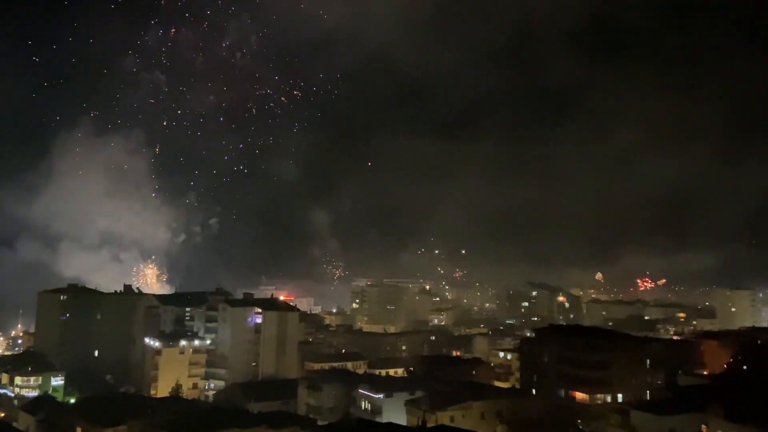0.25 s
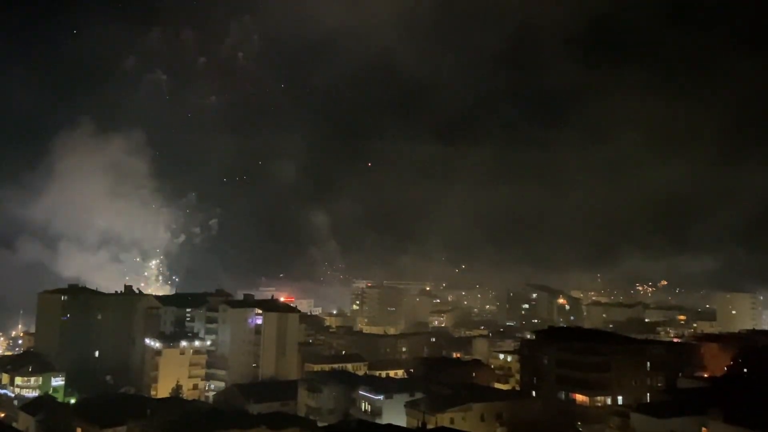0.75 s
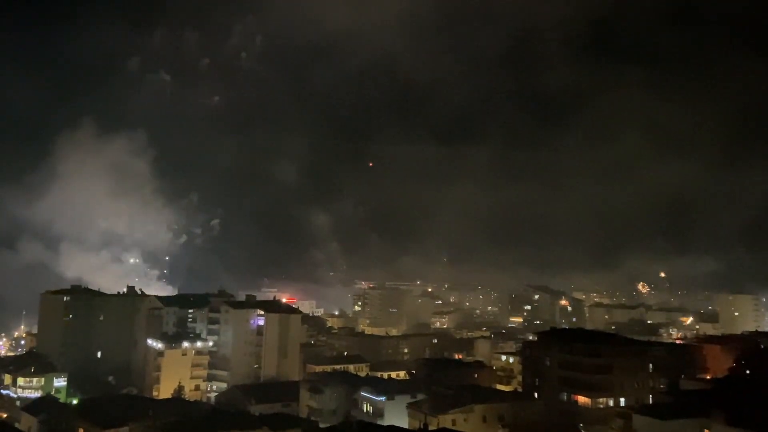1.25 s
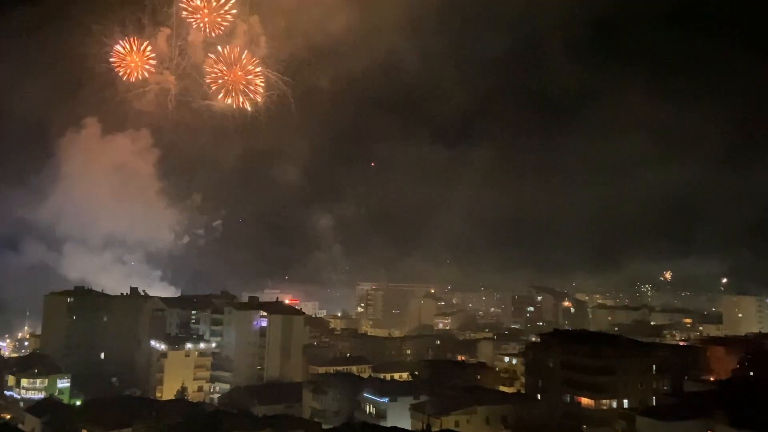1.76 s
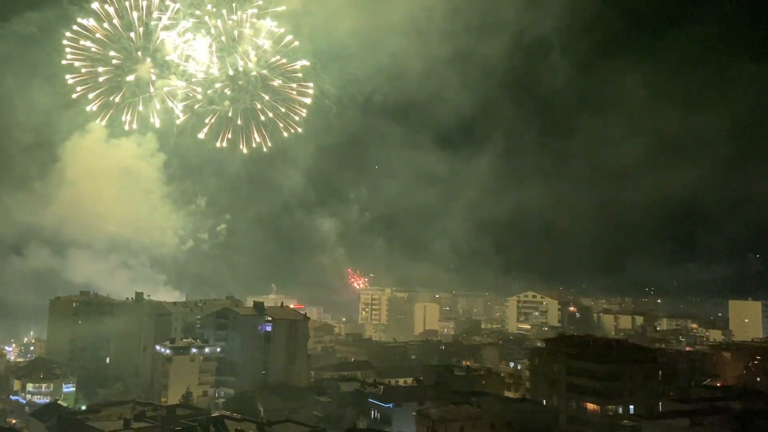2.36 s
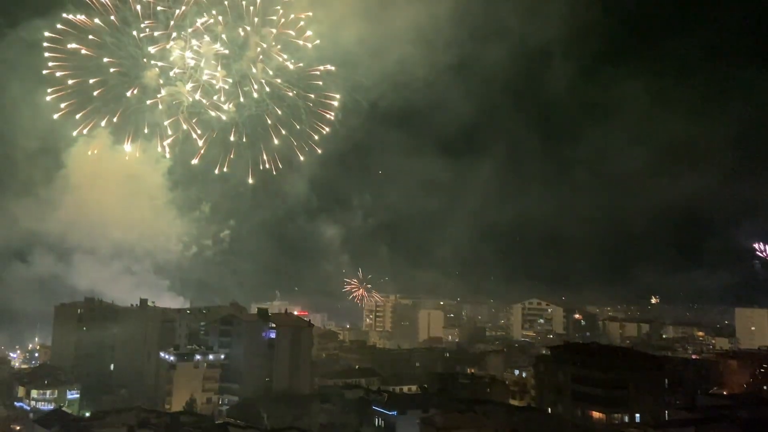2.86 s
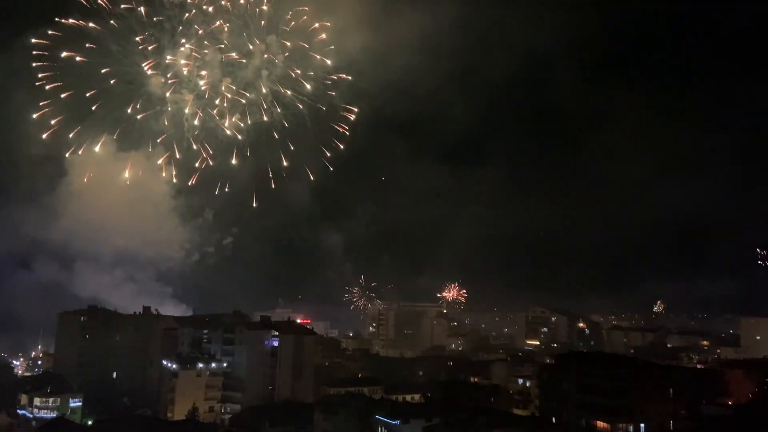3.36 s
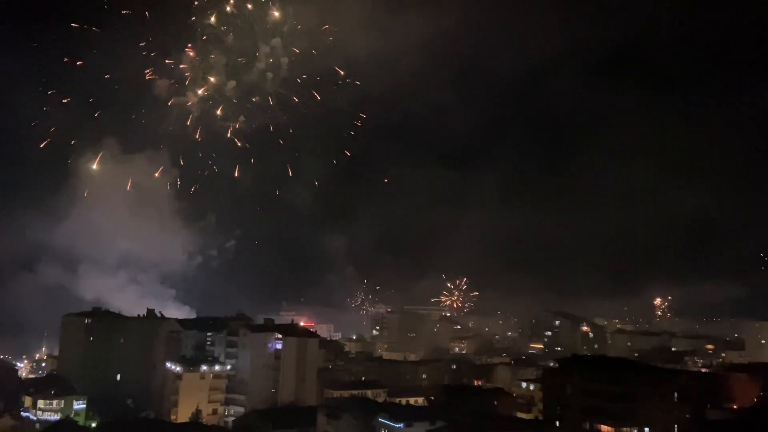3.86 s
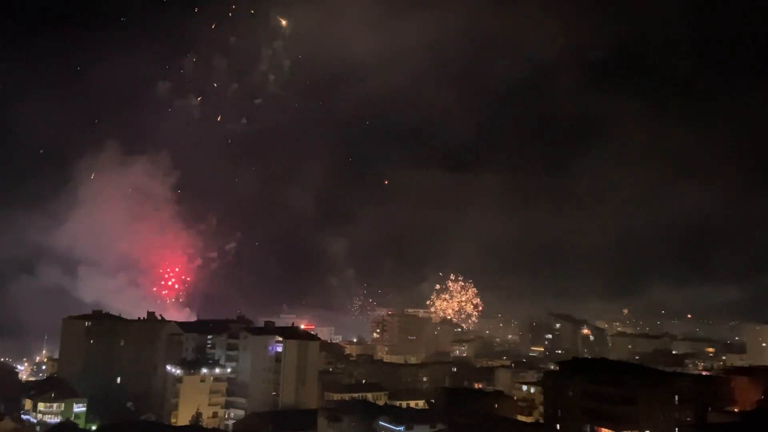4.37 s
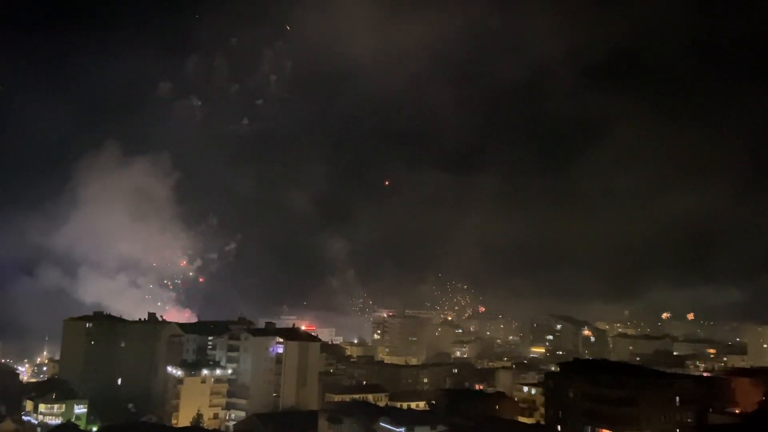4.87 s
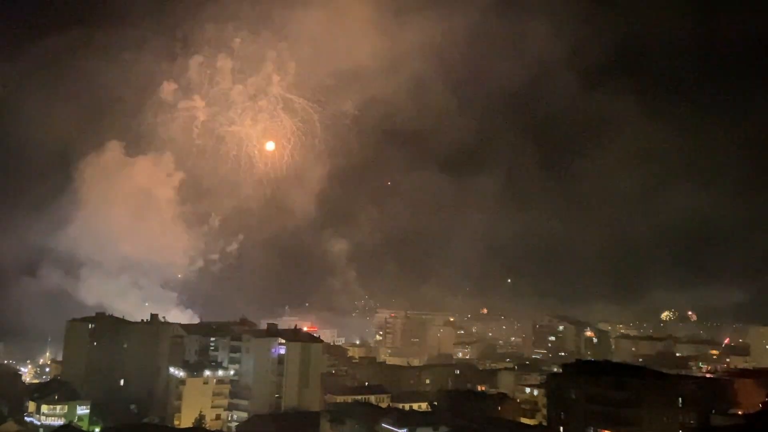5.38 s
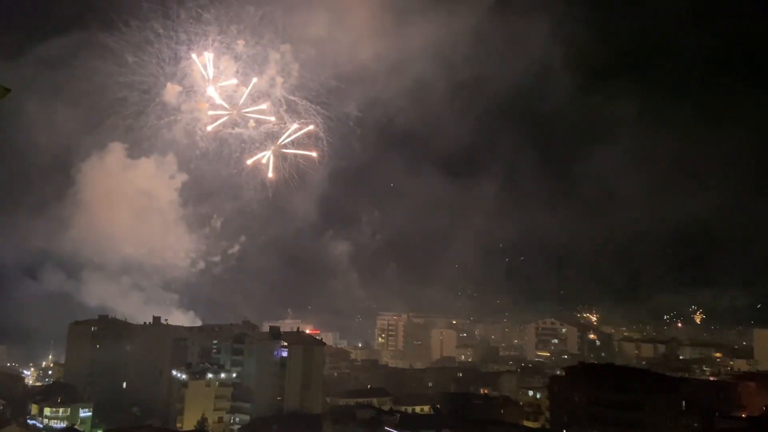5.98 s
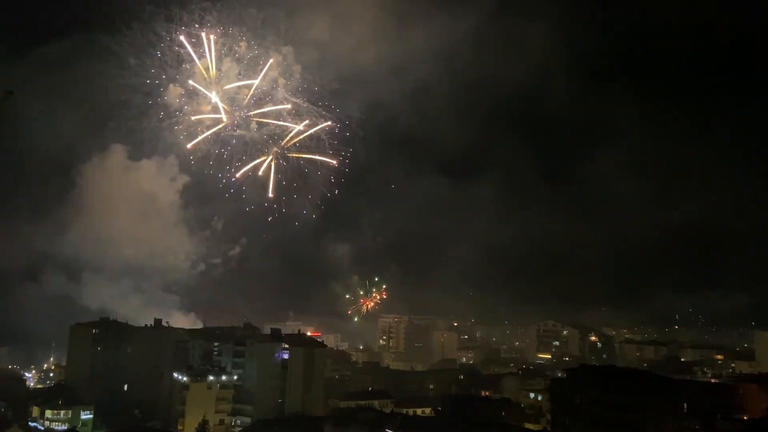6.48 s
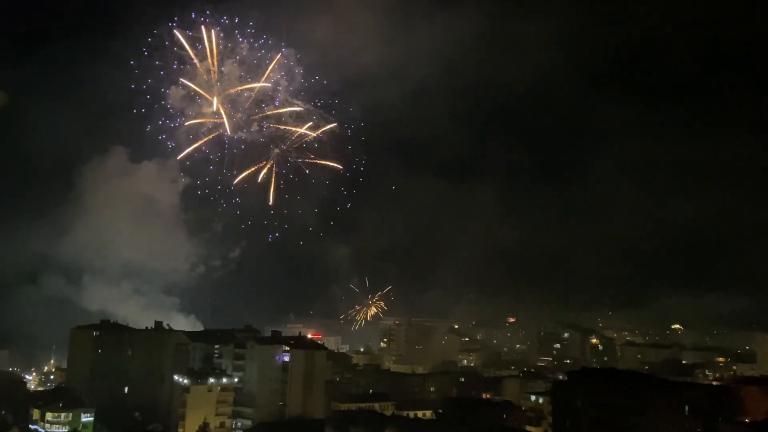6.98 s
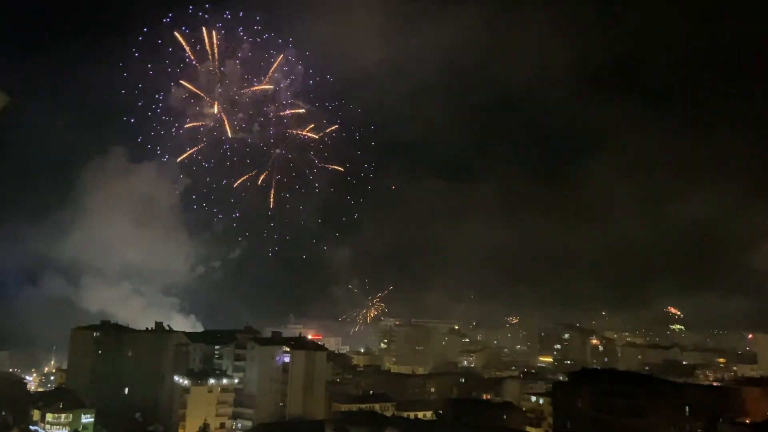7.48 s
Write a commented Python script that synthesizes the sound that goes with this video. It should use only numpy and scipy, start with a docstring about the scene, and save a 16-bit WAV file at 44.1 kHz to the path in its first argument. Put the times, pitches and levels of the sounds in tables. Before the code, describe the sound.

From a high window, close firework blasts bang in clusters while far pops, crackling stars and rolling echoes fill the night town.

```python
"""Fireworks over a town at night, heard from a high window.
0-2.7 s: salvo echo already rolling over a steady din (shaped noise and clicks); far pops (smeared weak fronts),
near blasts (shock and suction pulses with echoes), star sizzle (dense clicks), single snaps (short blasts).
2.7-5.3 s: second salvo, low rolls (band-passed noise), dense blasts; right side louder from 3.4 s.
5.3-6.2 s: no near blasts, distant crackle. 6.2-7 s: third salvo and blasts; then low rolls, last blast at 7.7 s."""
import sys
import numpy as np
from scipy import signal
from scipy.fft import rfft, irfft, next_fast_len
from scipy.io import wavfile
from scipy.ndimage import uniform_filter1d, minimum_filter1d

SR = 44100
rng = np.random.default_rng(int(sys.argv[2]) if len(sys.argv) > 2 else 0)


def unload_wav(signal):
    """Save mono or channel-first audio to the path in sys.argv[1] as 16-bit WAV at rate SR, clipped to [-1, 1]."""
    wavfile.write(
        sys.argv[1],
        SR,
        np.round(np.clip(np.atleast_2d(signal).T, -1, 1) * 32767).astype(np.int16),
    )


N = 340893

# spectra of noise and clicks: f/Hz, relative density/dB per Hz
RUMBLE_SPECTRUM = [(20, -27), (40, -29.5), (60, 2), (95, 2.5), (130, 4), (190, 7), (280, -4), (600, -59),
                   (3000, -100)]
ROAR_SPECTRUM = [(30, -53), (90, -12.5), (170, 1.5), (250, 5.5), (450, 1), (700, -1.5), (1000, -15),
                 (1500, -27.5), (3000, -64.5), (9000, -100)]
BOOM_SPECTRUM = [(15, -23), (30, -20), (58, 2), (80, -1.5), (160, -34.5), (1000, -100)]
THUD_SPECTRUM = [(80, -39.5), (220, -15.5), (350, -1), (540, 3.5), (800, -10), (1300, -18.5), (3000, -41.5),
                 (9000, -100)]   # separate far thuds that make the roar ragged
FAR_CRACKLE_SPECTRUM = [(60, -38.5), (400, 6), (900, 4), (1300, 2.5), (1550, -1), (2000, -1.5),
                        (3000, -11.5), (4500, -22.5), (6000, -40.5), (9000, -67.5), (16000, -99)]
NEAR_HISS_SPECTRUM = [(100, -38.5), (1000, 6.5), (3000, 17.5), (4900, 11), (6000, 0.5), (7500, 0.5),
                      (9000, -28), (10500, -14), (16000, -43)]
STAR_SPECTRUM = [(60, -34), (200, 17.5), (600, 16.5), (2200, 0.5), (4800, -6), (7500, -16.5),
                 (11000, -24.5), (16000, -43)]
# one band: tiny charges have no bass, the air takes their treble
FAR_CLOUD_SPECTRUM = [(300, -44), (1100, -10), (1700, 4), (2300, 1.5), (2900, -6), (4200, -22),
                      (6000, -42.5), (12000, -82.5)]
# likeness of left and right: f/Hz, correlation/1
STEREO_LIKENESS = [(60, 0.81), (130, 0.94), (290, 0.49), (640, 0.011), (1400, 0.29), (3000, 0.58),
                   (7000, 0.8), (15000, 1)]

# steady din from all over town; crackle before far_gain_db
DIN_RUMBLE_DB, DIN_ROAR_DB, DIN_CRACKLE_DB = -39.5, -41, -49.5
# echoes of big salvos: t/s, rumble/dB, roar/dB, far crackle/dB, near hiss/dB (last two before crackle gains)
SALVOS = [(-0.4, -32, -27.5, -36.5, -46.5), (2.721, -24.5, -25, -34.5, -46),
          (6.8, -22, -28.5, -33.5, -46.5)]
# rise as the wave reaches more streets, then fall, treble first
ROLL_RISE_S, HISS_RISE_S = 0.51, 0.42
RUMBLE_FALL_DB_PER_S, ROAR_FALL_DB_PER_S, CRACKLE_FALL_DB_PER_S, HISS_FALL_DB_PER_S = 8, 10.5, 11.5, 29
# distant barrages: t/s, rise/s, crackle/dB (before far_gain_db), roar/dB
BARRAGES = [(0.0, 0.11, -43, -48), (1.001, 0.02, -40, -34), (1.249, 0.17, -43, -40),
            (1.699, 0.052, -35, -53), (2.43, 0.016, -46, -37.5), (3.42, 0.32, -32, -28.5),
            (3.9, 0.24, -40, -39), (4.28, 0.23, -30.5, -28), (4.749, 0.32, -38.5, -35),
            (5.35, 0.21, -40.5, -35), (5.551, 0.35, -39, -38), (7.05, 0.21, -33.5, -31)]
BARRAGE_FALL_DB_PER_S = 33.5
THUD_DB = -5.5   # re roar level

# star clouds across town: t/s, rise/s, level/dB
FAR_CLOUDS = [(0.08, 0.057, -41), (0.39, 0.04, -43.5), (3.55, 0.13, -37.5), (4.42, 0.059, -44.5),
              (5.62, 0.25, -39), (5.93, 0.093, -44.5)]
FAR_CLOUD_FALL_DB_PER_S = 53
# far bursts: t/s, peak/dB (before level_db), thud f/Hz
POPS = [(0.145, -19, 417), (0.165, -18.5, 450), (0.307, -17.5, 380), (0.653, -13.5, 268), (0.721, -22, 236),
        (1.526, -16, 457), (1.583, -15.5, 480), (1.682, -20.5, 450), (2.162, -18.5, 420), (2.176, -23, 300),
        (2.252, -19, 480), (2.326, -20.5, 320), (2.482, -21.5, 600), (2.505, -19.5, 560),
        (2.851, -15.5, 260), (3.053, -14, 404), (3.458, -11, 400), (3.51, -7.5, 380), (3.615, -21, 260),
        (4.351, -24, 400), (4.87, -12.5, 296), (5.29, -17, 613), (5.562, -17.5, 525), (5.619, -21, 288),
        (6.314, -26, 600), (6.448, -18.5, 600), (6.641, -12, 520), (6.993, -16, 620), (7.594, -21, 239)]
POP_SMEAR_S = 0.012
# long echoes, each from one part of town: t/s, level/dB, f/Hz
ROLLS = [(0.131, -32, 75), (0.293, -37, 70), (0.639, -32, 94), (1.209, -45, 70), (1.73, -37, 161),
         (2.73, -24, 90), (2.81, -28, 115), (3.07, -19.5, 112), (3.159, -28, 125), (3.3, -22.5, 147),
         (3.352, -22.5, 66), (3.66, -25, 145), (3.86, -29, 94.6), (7.078, -27.5, 161), (7.179, -23, 164),
         (7.32, -26, 130.8), (7.631, -28, 79.6)]
ROLL_SWELL_S, ROLL_WIDTH_RATIO = 0.024, 1.3   # time to peak; band edges re f
# clouds of crackling stars: t/s, level/dB, decay/s
STAR_CLOUDS = [(1.016, -27.5, 0.02), (1.065, -32.5, 0.024), (1.599, -35, 0.24), (1.721, -24, 0.037),
               (2.165, -42, 0.2), (2.468, -43, 0.052), (2.720, -31.5, 0.3), (2.944, -29, 0.14),
               (3.411, -26, 0.11), (3.44, -21, 0.0082), (3.675, -34.5, 0.18), (4.348, -36, 0.36),
               (4.454, -31.5, 0.047), (5.893, -41.5, 0.16), (6.395, -30, 0.071), (6.96, -25.5, 0.051)]
CLOUD_SWELL_S = 0.012
# facade hiss after each cloud: level re cloud (before near_gain_db)
CLOUD_HISS_DB, CLOUD_HISS_RISE_S, CLOUD_HISS_FALL_DB_PER_S = -25, 0.082, 54.5

# near bursts: t/s, blast/dB, overpressure/ms, air cut-off f/Hz, facade echo/dB, ledge delay/ms, ledge echo/dB
BANGS = [(0.3037, -10.5, 3.2, 2200, -18, 7.9, -10), (0.5576, 5, 1.8, 2900, -8.5, 5.3, -11.5),
         (1.022, -7, 1.25, 4600, -4.5, 6.3, -11), (1.1914, 7.5, 0.87, 2000, -16.5, 3.3, -9),
         (1.7224, -0.5, 0.42, 5200, -5, 0.85, -15), (1.8698, -5.5, 1.5, 1090, -25, 0.62, -17),
         (2.7176, 5.5, 3.7, 3200, -7.5, 1.1, -27), (2.7974, 3, 3, 4530, -9.5, 2.2, -12),
         (2.803, 2.5, 3.2, 5800, -11, 2.2, -10), (3.4082, 4, 1.14, 6500, -13, 0.95, -19),
         (3.4488, 1, 0.56, 11200, -3, 0.56, -14), (3.5023, 2.5, 1.15, 3930, -9.5, 1.8, -30),
         (3.7383, 4, 1.42, 2440, -5, 3.8, -10), (4.3269, -6.5, 0.98, 1400, 0.5, 1.7, -1),
         (4.3894, -8.5, 0.45, 3000, 6, 1.7, -8), (4.7929, 9.5, 1.4, 1950, -10.5, 5.4, -8),
         (5.2109, 6, 1.36, 2900, -10, 2.8, -11), (6.242, -0.5, 1.03, 1200, -5, 5.3, -6),
         (6.3014, -4.5, 0.78, 1130, -12, 1.8, -9), (6.3987, -3.5, 1.33, 2400, -1.5, 8.6, -10),
         (6.653, 7, 3.3, 4200, -7, 1.6, -14), (6.8168, 6, 3.3, 6000, -5, 0.9, -12),
         (6.895, 5.5, 3.6, 4700, -7.5, 1.1, -27), (6.9527, -1, 0.75, 6600, -16, 1.7, -9),
         (6.9941, -2, 0.75, 2400, -19, 1.6, 1.5), (7.7090, 6.5, 1.6, 2070, -9, 4.07, -1.5)]
# single stars apart from the clouds: t/s, blast/dB, air cut-off f/Hz
SNAPS = [(0.151, -6, 1600), (0.19, -7, 1700), (0.334, -14, 2010), (0.47, -23.5, 6000), (1.071, -8.5, 2500),
         (1.082, -12.5, 4000), (1.7402, -1.5, 2000), (1.755, -6, 1400), (2.146, -25, 3440),
         (2.162, -16, 1400), (3.064, -7, 2000), (3.312, -10, 3500), (3.429, -7, 4500), (3.445, -7, 3500),
         (3.456, -10.5, 2970), (3.57, -6, 2000), (3.604, -9, 5000), (4.351, -21, 4000), (4.469, -2.5, 1800),
         (4.4856, 1, 1500), (6.09, -10, 1500), (6.459, -7, 5250), (6.686, -11.5, 8000),
         (6.765, -18.5, 6000), (6.9276, -14, 9000), (6.975, -11, 5000)]
SNAP_MS, SNAP_ECHO_DB, SNAP_LEDGE_MS, SNAP_LEDGE_DB = 0.19, 2, 0.94, -9.5
AIR_STEEP_RATIO = 3.9   # re air cut-off: treble falls twice as steeply above
# walls beside the window: nominal delay/s, echo/dB
WALLS = [(.0029, -12), (.0047, -13), (0.012, -19.5)]
# hollow notes of the window recess: f/Hz, width/Hz, gain/dB
RECESS_NOTES = [(132.3, 26.5, -5.5), (370, 174, -8)]

# microphone all-passes, low notes later, so a blast sweeps downward: f/Hz, Q/1
MIC_DISPERSION = [(142, 1.53), (320, 1.36), (255, 0.06), (3250, 0.51)]
# left port lags right around these notes: f/Hz, Q/1
PORT_LAG = [(1400, 3.4), (9000, 3.7), (13300, 32)]
# right port shaded, then mostly uncovered: t/s, left minus right below the top treble/dB
PORT_SHADE = [(3.42, 8.5), (3.62, 2)]
CUTOFF_HZ = 16600


def from_db(db):
    """Decibels to gain."""
    return 10 ** (np.asarray(db) / 20)


def rms_one(x):
    """Scale to unit power."""
    return x / np.sqrt(np.mean(x ** 2) + 1e-20)


def at_hz(points, hz):
    """Read a table along a log-frequency axis."""
    f, value = np.transpose(points)
    return np.interp(np.log(hz + 1), np.log(f), value)


def add(out, s, sound):
    """Mix a stereo sound in at time s."""
    start = max(round(s * SR), 0)
    out[:, start:start + sound.shape[1]] += sound[:, :max(N - start, 0)]


def cut(x, hz, kind, order):
    """Butterworth low-pass or high-pass."""
    sos = signal.butter(order, np.clip(hz, 10, .45 * SR), kind, fs=SR, output="sos")
    return signal.sosfilt(sos, x + 1e-18)


def allpass(x, hz, q):
    """Delay the notes around hz, level unchanged."""
    w = 2 * np.pi * hz / SR
    a = [1 + np.sin(w) / (2 * q), -2 * np.cos(w), 1 - np.sin(w) / (2 * q)]
    return signal.lfilter(a[::-1], a, x + 1e-18)


def diffuse(pair, spectrum=None):
    """Two unrelated signals to surround sound: alike in bass and top treble, least alike near 640 Hz."""
    length = pair.shape[1]
    size = next_fast_len(length, True)
    hz = np.arange(size // 2 + 1) * SR / size
    weight = from_db(at_hz(spectrum, hz)) if spectrum else 1
    mid, side = rfft(pair, size) * weight
    alike = np.clip(at_hz(STEREO_LIKENESS, hz), -1, 1)
    mid, side = mid * np.sqrt(1 + alike), side * np.sqrt(1 - alike)
    return rms_one(irfft(np.array([mid + side, mid - side]), size)[:, :length])


def reports(per_s, spread_db, wash_db):
    """Countless small explosions: random clicks of uneven size on a smooth noise wash."""
    sizes = from_db(spread_db * np.minimum(rng.exponential(1, (2, N)), 4))
    signs = rng.choice([-1, 1], (2, N))
    clicks = sizes * signs * (rng.random((2, N)) < per_s / SR)
    return rms_one(clicks) + from_db(wash_db) * rng.standard_normal((2, N))


def clumps(per_s, depth_db, size=N):
    """Randomly wandering gain: bursts and echoes arrive in bunches."""
    knots = rng.standard_normal(2000)
    wander = np.interp(np.arange(size) / SR * per_s, np.arange(len(knots)), knots)
    return from_db(depth_db * wander)


def swell(s, rise_s, fall_db_per_s):
    """Envelope: linear climb from time s to 1, then exponential fall."""
    age = np.arange(N) / SR - s
    return np.clip(age / rise_s, 0, 1) * from_db(-fall_db_per_s * np.maximum(age - rise_s, 0))


def together(levels):
    """Unrelated sounds sum in power."""
    return np.sqrt(sum(level ** 2 for level in levels))


def rolling_echoes(boom_gain_db=5, boom_growth=1.54):
    """Bursts all over town merge into rumble and roar; the deep boom grows faster than the rumble."""
    rumble_level = together(
        [from_db(DIN_RUMBLE_DB)]
        + [from_db(db) * swell(s, ROLL_RISE_S, RUMBLE_FALL_DB_PER_S) for s, db, _, _, _ in SALVOS])
    roar_level = together(
        [from_db(DIN_ROAR_DB)]
        + [from_db(db) * swell(s, ROLL_RISE_S, ROAR_FALL_DB_PER_S) for s, _, db, _, _ in SALVOS]
        + [from_db(db) * swell(s, rise_s, BARRAGE_FALL_DB_PER_S) for s, rise_s, _, db in BARRAGES])
    rumble = diffuse(reports(per_s=72, spread_db=-2.5, wash_db=-2.0), RUMBLE_SPECTRUM)
    rumble = rumble * clumps(per_s=18, depth_db=2.5)
    roar = diffuse(reports(per_s=200, spread_db=-1.5, wash_db=11.0), ROAR_SPECTRUM)
    roar = roar * clumps(per_s=45, depth_db=2.15)
    thuds = diffuse(reports(per_s=60, spread_db=2.5, wash_db=-15), THUD_SPECTRUM)
    boom = diffuse(rng.standard_normal((2, N)), BOOM_SPECTRUM)
    boom = boom * from_db(boom_gain_db) * rumble_level ** boom_growth
    return rumble_level * rumble + roar_level * (roar + from_db(THUD_DB) * thuds) + boom


def crackle(far_gain_db=2, near_gain_db=4):
    """Dense clicks follow salvos, barrages and star clouds; the air takes the treble from the far ones."""
    far_level = together(
        [from_db(DIN_CRACKLE_DB)]
        + [from_db(db) * swell(s, ROLL_RISE_S, CRACKLE_FALL_DB_PER_S) for s, _, _, db, _ in SALVOS]
        + [from_db(db) * swell(s, rise_s, BARRAGE_FALL_DB_PER_S) for s, rise_s, db, _ in BARRAGES])
    near_level = together(
        [from_db(db) * swell(s, HISS_RISE_S, HISS_FALL_DB_PER_S) for s, _, _, _, db in SALVOS]
        + [from_db(db + CLOUD_HISS_DB) * swell(s, CLOUD_HISS_RISE_S, CLOUD_HISS_FALL_DB_PER_S)
           for s, db, _ in STAR_CLOUDS])
    far = diffuse(reports(per_s=260, spread_db=3.5, wash_db=0.5), FAR_CRACKLE_SPECTRUM)
    near = diffuse(reports(per_s=1100, spread_db=3.5, wash_db=13), NEAR_HISS_SPECTRUM)
    both = from_db(far_gain_db) * far_level * far + from_db(near_gain_db) * near_level * near
    return both * clumps(per_s=66, depth_db=0.9)


def far_clouds():
    """Distant star clouds: narrow-band clicks in ragged bunches."""
    level = together([from_db(db) * swell(s, rise_s, FAR_CLOUD_FALL_DB_PER_S) for s, rise_s, db in FAR_CLOUDS])
    sizzle = diffuse(reports(per_s=520, spread_db=2.0, wash_db=-3), FAR_CLOUD_SPECTRUM)
    return level * clumps(per_s=110, depth_db=3) * sizzle


def far_pops(level_db=1, front=2.9, air_hz=1900, crack=0.073):
    """Far bursts come mostly by way of the buildings: a weak front in a short smear."""
    out, t = np.zeros((2, N)), np.arange(SR // 5) / SR
    for s, peak_db, thud_hz in POPS:
        paths = diffuse(rng.standard_normal((2, len(t)))) * np.exp(-t / POP_SMEAR_S)
        paths[:, 0] -= front * np.sqrt(POP_SMEAR_S * SR) / 10
        thud = cut(paths, 0.7 * thud_hz, "low", order=2)
        thud = cut(thud, thud_hz, "high", order=2)
        pop = cut(thud + crack * paths, air_hz, "low", order=4)   # a little crack survives
        add(out, s, from_db(peak_db + level_db) * pop / np.abs(pop).max())
    return out


def rolls():
    """Whole blocks of buildings return the blasts as low swells of band-passed noise."""
    out, age = np.zeros((2, N)), np.arange(SR // 3) / SR / ROLL_SWELL_S
    shape = age * np.exp(1 - age)
    for s, level_db, hz in ROLLS:
        noise = diffuse(rng.standard_normal((2, len(age))))
        roll = cut(noise * shape, hz * ROLL_WIDTH_RATIO, "low", order=3)
        roll = cut(roll, hz / ROLL_WIDTH_RATIO, "high", order=3)
        add(out, s, from_db(level_db) * rms_one(roll) * np.sqrt(np.mean(shape ** 2)))
    return out


def star_clouds(split_hz=7500, close_db=-29):
    """Stars go off almost together: clicks that swell and fade, brighter when louder, as if closer."""
    power, t = np.zeros(N), np.arange(N) / SR
    for s, level_db, decay_s in STAR_CLOUDS:
        age = np.maximum(t - s, 0)
        shape = (1 - np.exp(-age / CLOUD_SWELL_S)) * np.exp(-age / decay_s)
        power += (from_db(level_db) * shape / shape.max()) ** 2
    level = np.sqrt(power)
    sizzle = diffuse(reports(per_s=700, spread_db=3.0, wash_db=-3), STAR_SPECTRUM)
    sizzle = sizzle * clumps(per_s=220, depth_db=3)
    closeness = np.minimum(level / from_db(close_db), 1)
    treble = cut(sizzle, split_hz, "high", order=5)
    return level * (cut(sizzle, split_hz, "low", order=5) + closeness * treble)


def shock(push_s, air_hz, rebound=1.0):
    """Overpressure front and suction phase, dulled by the air."""
    age = np.arange(SR // 20) / SR / push_s
    blast = cut(-(1 - age) * np.exp(-age), air_hz, "low", order=2)
    blast = cut(blast, AIR_STEEP_RATIO * air_hz, "low", order=2)
    return cut(blast, rebound / (2 * np.pi * push_s), "high", order=2)   # small shells have no bass


def facade_scatter(t, echo_db, facade_s=0.047, street_s=0.44, street_db=-5, first_wall_s=0.0003):
    """Diffuse echo: quick facades, then slow far streets, uneven house by house."""
    facades = (1 - np.exp(-(t / first_wall_s) ** 2)) * np.exp(-t / facade_s) / np.sqrt(facade_s)
    streets = (1 - np.exp(-t / facade_s)) * np.exp(-t / street_s) / np.sqrt(street_s)
    envelope = (facades + from_db(street_db) * streets) * np.sqrt(2 / SR)
    scatter = from_db(echo_db) * diffuse(rng.standard_normal((2, len(t)))) * envelope
    return scatter * clumps(per_s=140, depth_db=3, size=len(t))


def wall_slaps(size):
    """One reflection per wall and ear; the detour varies with where the shell bursts."""
    slaps = np.zeros((2, size))
    for delay_s, wall_db in WALLS:
        lags = delay_s * SR * (rng.uniform(.85, 1.15) + rng.uniform(-.04, .04, 2))
        slaps[[0, 1], lags.astype(int)] += from_db(wall_db)
    return slaps


def bangs(wall_hz=3000, ledge_hz=800, facade_hz=2600, haze_hz=10000):
    """Near blasts and snaps: each shock convolved with its straight, ledge, wall, facade and street paths."""
    out, t = np.zeros((2, N)), np.arange(SR) / SR
    snaps = [(s, db, SNAP_MS, air_hz, SNAP_ECHO_DB, SNAP_LEDGE_MS, SNAP_LEDGE_DB) for s, db, air_hz in SNAPS]
    for s, blast_db, push_ms, air_hz, echo_db, ledge_ms, ledge_db in BANGS + snaps:
        blast = shock(push_ms / 1000, air_hz)
        paths = cut(facade_scatter(t, echo_db), facade_hz, "low", order=1)
        paths += cut(wall_slaps(len(t)), wall_hz, "low", order=1)
        ledge = np.zeros(len(t))
        ledge[int(ledge_ms / 1000 * SR)] = from_db(ledge_db)
        paths += cut(ledge, ledge_hz, "high", order=1)   # a narrow ledge returns crack, little bass
        paths[:, 0] += 1   # straight path
        add(out, s, from_db(blast_db) * signal.fftconvolve(paths, blast[None], axes=1))
    return cut(cut(out, haze_hz, "low", order=1), hz=55.0, kind="high", order=1)


def recess(x):
    """Air in the window recess rings briefly: two-pole resonances added to the input."""
    out = x
    for hz, width_hz, gain_db in RECESS_NOTES:
        r = np.exp(-np.pi * width_hz / SR)
        poles = [1, -2 * r * np.cos(2 * np.pi * hz / SR), r * r]
        ring = (1 - r * r) / 2 * signal.lfilter([1, 0, -1], poles, x)
        out = out + from_db(gain_db) * ring
    return out


def scene():
    """Everything in the sky and its echoes, as it reaches the window."""
    town = rolling_echoes() + crackle() + far_clouds()
    return recess(town + far_pops() + rolls() + star_clouds() + bangs())


def limiter(x, ceiling, hold_s):
    """Gain ducks just ahead of each peak and recovers just after."""
    size = max(int(hold_s * SR), 3)
    need = np.minimum(1, ceiling / (np.abs(x) + 1e-9))
    return x * uniform_filter1d(minimum_filter1d(need, size, axis=1), size, axis=1)


def record(dry, bass_cut_hz=36):
    """Microphone: phase smear, louder left port, limiting, overload, top cut."""
    for hz, q in MIC_DISPERSION:
        dry = allpass(dry, hz, q)
    left, right = cut(dry, bass_cut_hz, "high", order=2)
    for hz, q in PORT_LAG:
        left = allpass(left, hz, q)
    shade_s, shade_db = np.transpose(PORT_SHADE)
    shade = from_db(-np.interp(np.arange(N) / SR, shade_s, shade_db))
    top = cut(right, hz=9900, kind="high", order=1)   # the highest treble still gets in
    right = shade * right + (1 - shade) * top
    ports = np.array([left, right]) * 2 / (1 + shade)
    loud = .99 * np.tanh(limiter(ports, ceiling=2.0, hold_s=.0007) / .99)
    return signal.sosfilt(signal.cheby2(18, 70, CUTOFF_HZ, fs=SR, output="sos"), loud)


dry = scene()
out = record(dry)
unload_wav(out)
```